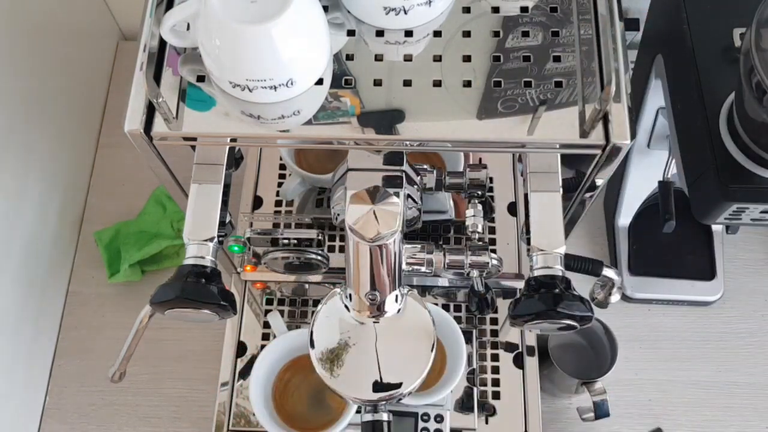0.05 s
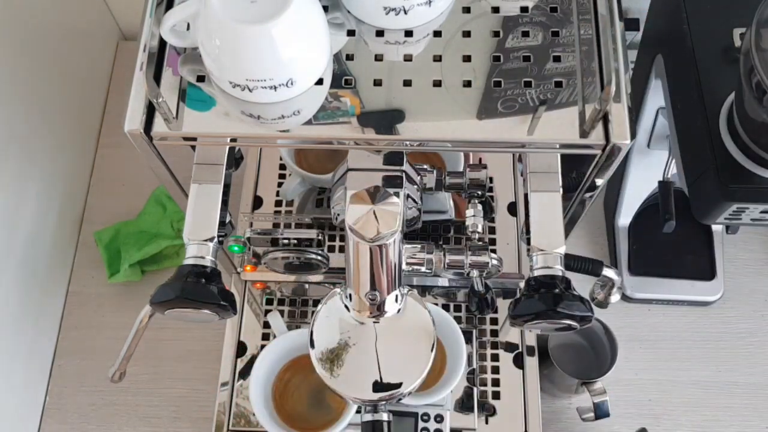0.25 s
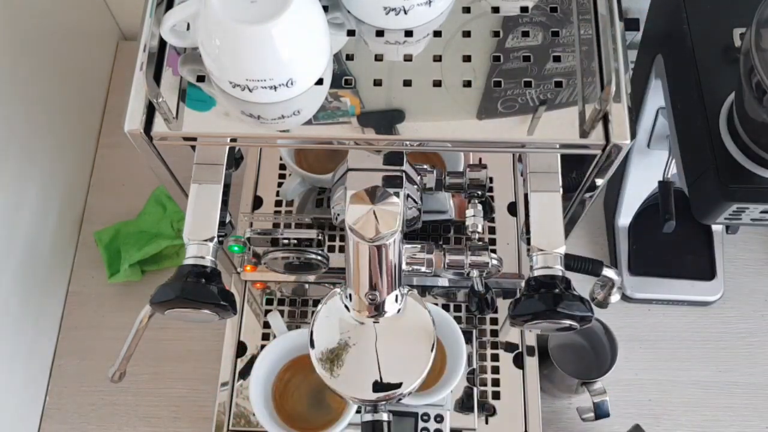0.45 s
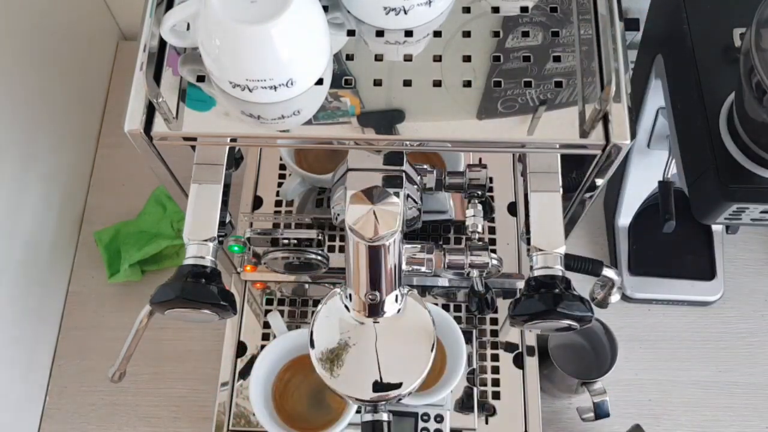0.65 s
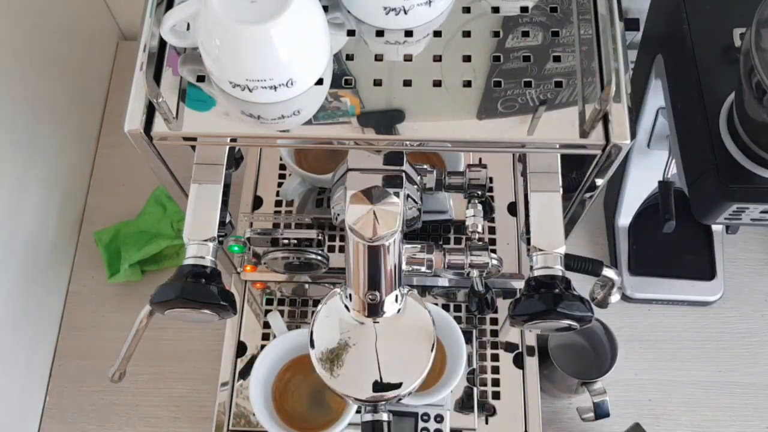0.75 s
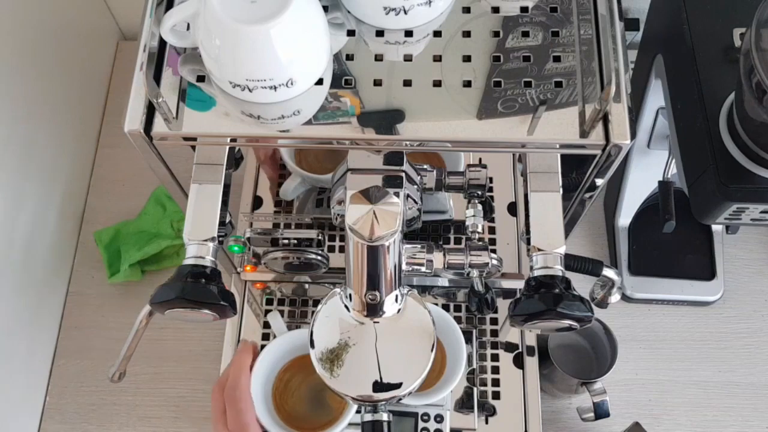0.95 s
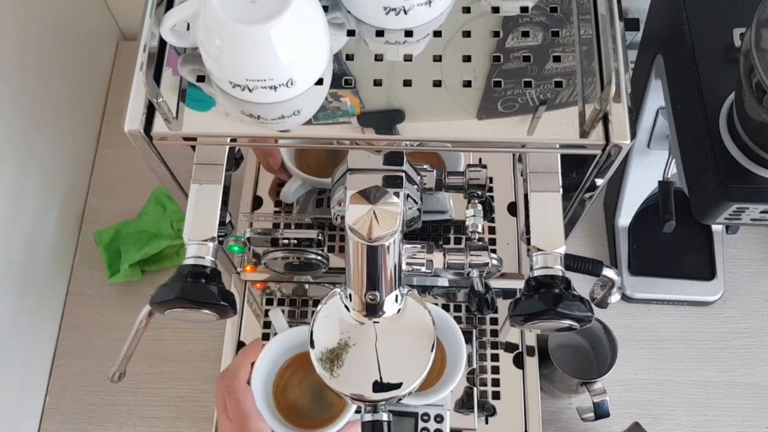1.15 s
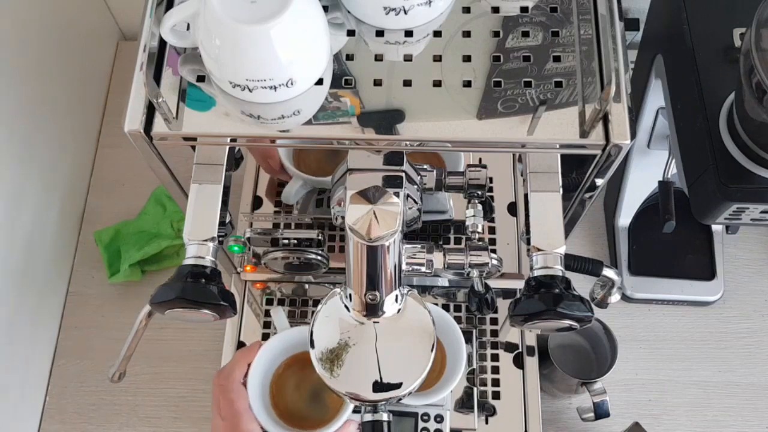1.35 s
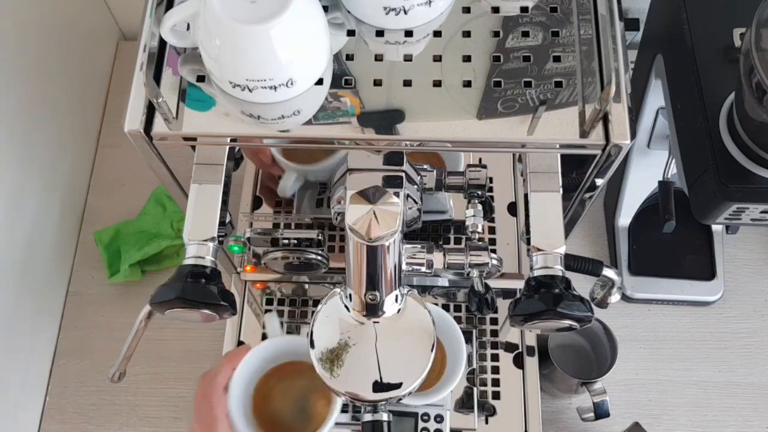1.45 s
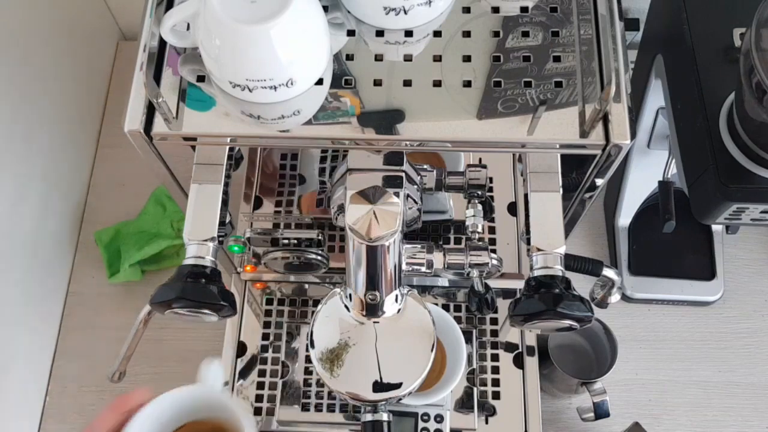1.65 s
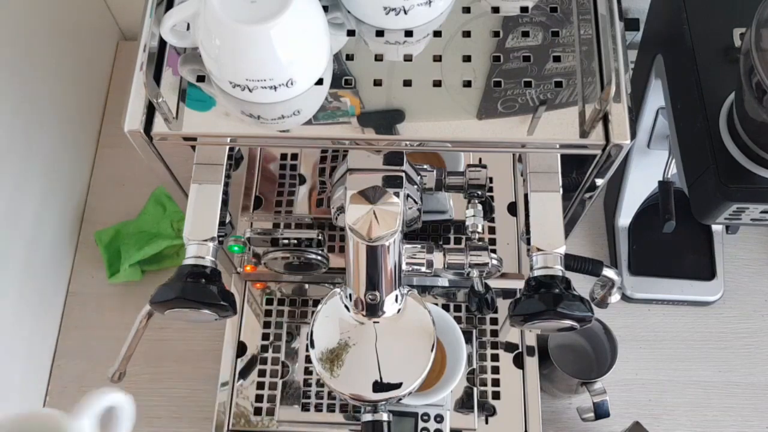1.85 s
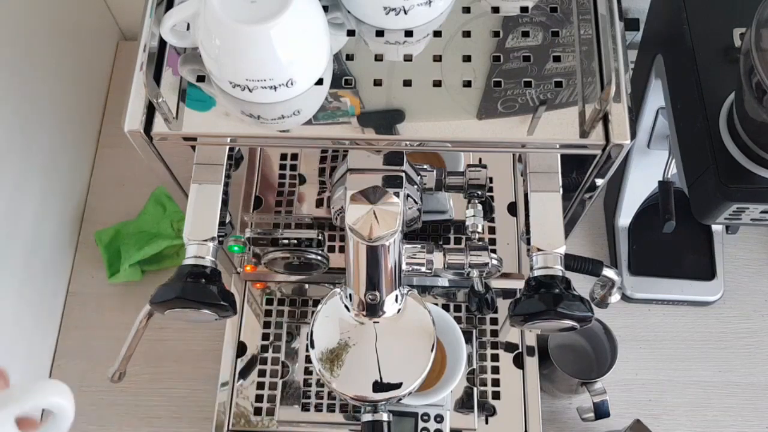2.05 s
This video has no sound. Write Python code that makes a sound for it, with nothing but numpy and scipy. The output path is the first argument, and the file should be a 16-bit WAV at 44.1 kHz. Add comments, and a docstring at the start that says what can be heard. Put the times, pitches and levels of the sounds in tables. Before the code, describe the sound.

An espresso machine switch clacks loudly at about 0.2 seconds, briefly ringing the steel case, and a duller knock follows at 0.4. From 1.1 to 1.6 seconds a cup is nudged, then dragged off the drip tray, scraping quietly with faint metal bumps and a chink near 1.4. A low hum, room air and faint handling rustle lie underneath in a small kitchen, everything slightly to the left.

```python
"""A hard clack comes first: the switch of an espresso machine is thrown in a small kitchen and rebounds
briefly, ringing the steel case. A duller knock follows from inside. Then a cup is nudged on the drip
tray and dragged off it: its foot sticks and slips on the grid, the cup chinks and the tray booms faintly.
A low hum, room air and a faint rustle of handling lie under it all."""
import sys
import numpy as np
from scipy import signal
from scipy.fft import rfft, irfft, next_fast_len
from scipy.io import wavfile
from scipy.ndimage import map_coordinates

SR = 44100
rng = np.random.default_rng(int(sys.argv[2]) if len(sys.argv) > 2 else 0)


def to_wav(s):
    """Save 16-bit WAV."""
    ch = np.atleast_2d(s).T  # columns
    pcm = np.round(np.clip(ch, -1, 1) * 32767)  # PCM
    wavfile.write(sys.argv[1], SR, pcm.astype(np.int16))


N = 92610

# tone of the room air (frequency [Hz], level [dB])
AIR_COLOUR = [(25, -18.5), (60, -6.5), (110, -13.5), (145, 3.5), (180, -13.5), (230, -9.5), (310, -20),
              (450, -28.5), (800, -32.5), (1500, -34.5), (4000, -37.5), (5800, -42), (7300, -39.5),
              (8600, -48), (11500, -30), (15500, -33)]
# how far air and hum lean left (frequency [Hz], left over right [dB])
AIR_LEAN = [(50, 3.5), (150, 4.5), (400, 5.5), (2000, 1.3)]
# how far all other sounds lean left (frequency [Hz], left over right [dB])
SOURCE_LEAN = [(60, 5), (110, 2.5), (200, 4), (380, 0), (700, 5.5), (1300, 2), (2400, 2), (8000, 2.5),
               (15000, 3)]
# how alike the two ears are (frequency [Hz], likeness [0 to 1])
EAR_LIKENESS = [(60, .9), (140, 0.73), (300, 0.83), (640, 0.58), (1400, 0.12), (4000, 0.038)]
# loudness of the handling rustle (time [s], level [dB])
RUSTLE_LEVEL = [(0, -62), (.08, -65.5), (.2, -68), (.71, -71), (.73, -68.5), (.84, -69.5), (.93, -78),
                (1.9, -95.5), (2.1, -70)]
# tone of the rustle (frequency [Hz], level [dB])
RUSTLE_COLOUR = [(50, -8), (120, 5.5), (230, 5), (420, -5), (650, -8), (850, -12.5), (1300, -17),
                 (2500, -26), (7500, -21.5), (16000, -34)]
# how long the room's echo takes to fade by 60 dB (frequency [Hz], fade time [s])
ROOM_FADE = [(100, 1), (350, 0.6), (1000, 0.5), (1800, 0.43), (4000, 0.39), (12000, 0.72)]
# tone of the echo (frequency [Hz], level [dB])
ROOM_COLOUR = [(60, -10.5), (200, -15), (500, -8), (1000, -4.5), (1600, -1), (4000, -3.5), (14000, -10)]

# pressure of the cup's foot on the grid (time [s], level [dB])
SCRAPE_LEVEL = [(1.0, -100), (1.097, -99.5), (1.101, -64.5), (1.138, -54), (1.18, -59.5), (1.23, -75),
                (1.342, -86), (1.358, -61.5), (1.378, -55), (1.39, -47), (1.412, -43), (1.44, -50),
                (1.462, -59.5), (1.496, -86), (1.572, -73), (1.63, -100)]
# tone of the tiny slips (frequency [Hz], level [dB])
GRIT_COLOUR = [(290, -42.5), (500, -15.5), (716, -1.5), (888, -20), (1150, -7), (1800, -7.5), (2330, -6),
               (3060, -6.5), (4380, -6.5), (5670, -10), (7240, -12), (13000, -11.5), (15500, -13)]
# resonances of cup and grid (frequency [Hz], width [Hz], level [dB])
CUP_PEAKS = [(560.4, 20, 10), (800, 51, 0), (1150, 61, 5), (1380, 270, 2.5), (2035, 22, 6), (2290, 21, 9.5),
             (3270, 40, 3), (4158, 18, 10.5), (4645, 39, 6.5), (7140, 280, 7.5), (9470, 70, 2),
             (11090, 84, 9)]
# loudness of the soft sliding (time [s], level [dB])
SLIDE_LEVEL = [(0.98, -76), (1.06, -71), (1.12, -53.5), (1.2, -58.5), (1.26, -65.5), (1.33, -64),
               (1.39, -60), (1.46, -54.5), (1.51, -65), (1.57, -66.5), (1.64, -106)]
# tone of the sliding (frequency [Hz], level [dB])
SLIDE_COLOUR = [(100, 12), (300, 9), (800, -6.5), (1500, -15.5), (2500, -11.5), (5000, -13), (7500, -19),
                (9000, -21.5), (16000, -34.5)]
# hollow resonance, cup at rest and then pulled out (frequency [Hz], width [Hz], level [dB])
HOLLOW_PEAKS = [(928, 233, 12.5), (1540, 390, 23)]
# the foot clicks over the edges of the grid (time [s], level [dB])
CHINKS = [(1.099, -59.5), (1.386, -56), (1.408, -48)]
# ringing notes of the cup (frequency [Hz], level [dB], fade time [s])
CUP_NOTES = [(1202, -3.5, 0.094), (1414, -19, 0.34), (4160, 3, .04), (7250, -18, 0.019),
             (11250, -13, 0.017)]
# the cup catches on the tray (time [s], level [dB])
BUMPS = [(1.099, -60), (1.1132, -44.5), (1.162, -48.5), (1.351, -45), (1.424, -44.5), (1.443, -45),
         (1.519, -55)]
# ringing notes of the tray (frequency [Hz], level [dB], fade time [s])
TRAY_NOTES = [(66.7, -13.5, 0.37), (136.8, -10, 0.54), (150.7, 0, 0.2), (181, -8, 0.71), (241.3, -5, 0.15),
              (406.5, -15.5, 0.24)]

# hits of the switch (time [s], thump [dB], clatter [dB], upper reach of the thump [Hz])
CLACK_HITS = [(0.2130, -15.5, -16.5, 3007), (0.2190, -15, -20.5, 1297), (0.2238, -12.5, -24, 404.2),
              (0.2335, -20.5, -28.5, 1100), (0.290, -35.5, -43, 485)]
# hits of the knock (time [s], thump [dB], clatter [dB], upper reach of the thump [Hz])
KNOCK_HITS = [(0.3659, -26, -36, 1500), (0.3690, -23, -39, 1110), (0.3772, -28.5, -43.5, 880),
              (0.3937, -18, -60, 405.7), (0.728, -46, -94, 330)]
# ringing notes of the case (frequency [Hz], level at switch [dB], level at knock [dB], fade time [s])
CASE_NOTES = [(66.46, -20.5, -31.5, .55), (78.4, -25.5, -29.5, 0.35), (130.2, -22, -25.5, 0.63),
              (175.9, -7, -12, .09), (195, -6, -9, 0.14), (222.1, -18.5, -6, 0.37), (249.15, -5, -19, 0.2),
              (341.5, -4, 0, .13), (380.8, -4.5, -4, 0.12), (445, -21.5, -9, .2), (508.6, -20, -30, .25),
              (558, -9.5, -20, 0.19), (635, -12, -17, 0.21), (728.3, 1, -21.5, 0.041),
              (769.4, -2, -5, 0.099), (832, -5.5, -25, 0.11), (911, -14, -32, 0.1),
              (1005, -5.5, -10, 0.043), (1181.3, -19, -24, 0.15)]
# tone of the panels' clatter in the clack (frequency [Hz], level [dB])
CLACK_COLOUR = [(40, -36), (150, -10), (400, 0), (800, 2), (1250, -10.5), (1480, -16.5), (2000, -9.5),
                (2400, -17), (2850, -13), (3400, -23), (4700, -23.5), (5500, -32), (7600, -27.5),
                (8600, -34.5), (12500, -34), (16000, -42)]
# tone of their clatter in the knock (frequency [Hz], level [dB])
KNOCK_COLOUR = [(40, -38), (200, -20), (400, -17), (800, 3.5), (1400, -6.5), (2200, -14), (4000, -22),
                (8000, -38.5), (13000, -33), (16000, -53)]
# how long the panels ring (frequency [Hz], fade time [s])
PANEL_FADE = [(200, 0.057), (900, 0.15), (3000, 0.15), (12000, 0.14)]

LEFT_RIGHT = np.array([[.5], [-.5]])  # splits a difference between the two ears
TIME = np.arange(N) / SR


def amp(db):
    """Turn decibels into a gain."""
    return 10 ** (np.asarray(db) / 20)


def unit(x):
    """Scale x to an average strength (rms) of 1."""
    return x / np.sqrt(np.mean(x ** 2) + 1e-20)


def along(points, hz):
    """Read between (frequency, value) points on a log scale."""
    freqs, values = np.transpose(points)
    return np.interp(np.log(hz + 1), np.log(freqs + 1), values)


def level(points):
    """A gain for each sample from (time, level) points, silent outside them."""
    times, db = np.transpose(points)
    return amp(np.interp(TIME, times, db, left=-140, right=-140))


def add(out, start_s, x):
    """Mix x into out from the start time on."""
    i = round(start_s * SR)
    out[..., i:i + x.shape[-1]] += x[..., :N - i]


def filtered(x, response):
    """Turn each frequency of x up or down by response(hz)."""
    n = x.shape[-1]
    padded = next_fast_len(n + 8192)
    return irfft(rfft(x, padded) * response(np.fft.rfftfreq(padded, 1 / SR)), padded)[..., :n]


def resonances(peaks):
    """A flat response with resonant peaks added."""
    return lambda f: 1 + sum(amp(db) * 1j * f * width / (hz * hz - f * f + 1j * f * width)
                             for hz, width, db in peaks)


def stereo(pair, colour):
    """Shape the tone of two unrelated signals and blend them so the bass is alike in both ears."""
    def blend(hz):
        turn = np.arccos(along(EAR_LIKENESS, hz)) / 2
        return amp(along(colour, hz)) * np.array([np.cos(turn), np.sin(turn)])
    mid, side = filtered(pair, blend)
    return np.array([mid + side, mid - side])


def leaning(x, lean):
    """Make x louder on the left."""
    return filtered(x, lambda hz: amp(LEFT_RIGHT * along(lean, hz)))


def noise(colour):
    """Stereo noise with the given tone."""
    return unit(stereo(rng.standard_normal((2, N)), colour))


def fading(x, fade_times):
    """Let each frequency of x fade at its own speed."""
    hz, t, spectrum = signal.stft(x, SR, nperseg=256)
    fade = amp(-60 * t / along(fade_times, hz)[:, None])
    return signal.istft(spectrum * fade, SR, nperseg=256)[1][:, :N]


def ring(notes, rise_s, wander_share=0.0045, turns_per_s=40, ear_lag_s=.0002, scatter_db=1):
    """A struck object's fading notes; each wanders in pitch and comes from its own direction."""
    t, tone = np.arange(SR) / SR, 0
    for hz, db, fade_s in notes:
        wobble = map_coordinates(rng.standard_normal(200), [t * turns_per_s])
        wander = wander_share * np.cumsum(wobble) / SR
        lag = ear_lag_s * rng.standard_normal() * LEFT_RIGHT
        gain = amp(db + scatter_db * rng.standard_normal() - 60 * t / fade_s)
        tone = tone + gain * np.sin(2 * np.pi * hz * (t + wander + lag))
    return tone * (1 - np.exp(-t / rise_s))


def background(air_db=-64, hum_hz=139.4, hum_db=-73.5, waver_db=6.5):
    """Room air with a low, wavering hum."""
    drift, waver = [map_coordinates(points, [TIME * 8]) for points in rng.standard_normal((2, 24))]
    hum = np.sqrt(2) * amp(hum_db + waver_db * waver) * np.sin(2 * np.pi * hum_hz * TIME + 1.7 * drift)
    return leaning(amp(air_db) * noise(AIR_COLOUR) + hum, AIR_LEAN)


def handling_rustle():
    """Handling makes a faint, low noise that swells and sinks."""
    return noise(RUSTLE_COLOUR) * level(RUSTLE_LEVEL)


def kitchen_echo(x, build_s=0.0087, lean_db=1):
    """Sound bounces around the room in a wash that builds quickly and dies away."""
    tail = fading(noise([(20, 0), (20000, 0)]), ROOM_FADE) * (1 - np.exp(-TIME / build_s))
    tail = filtered(tail / np.linalg.norm(tail[0]), lambda hz: amp(along(ROOM_COLOUR, hz)))
    echo = signal.fftconvolve(x.mean(0)[None], tail, axes=1)[:, :N]
    return echo * amp(lean_db * LEFT_RIGHT)


def cup_scrape(slips_per_s=4500, spread_db=1.5, stick_hz=177.7, stick_db=-0.5):
    """The foot sticks and slips; each tiny slip makes cup and grid ring."""
    stick = amp(stick_db * map_coordinates(rng.standard_normal(1000), [TIME * stick_hz]))
    slipping = rng.random(N) < slips_per_s / SR
    slips = slipping * amp(spread_db * rng.standard_normal(N)) * rng.standard_normal((2, N))
    grit = stereo(stick * slips, GRIT_COLOUR)
    return unit(filtered(grit, resonances(CUP_PEAKS))) * level(SCRAPE_LEVEL)


def cup_slide(pull_s=1.36, blend_s=0.028):
    """Soft rubbing; its hollow tone gives way to a higher one as the cup leaves the grid."""
    rub = noise(SLIDE_COLOUR)
    pulled = .5 + .5 * np.tanh((TIME - pull_s) / blend_s)
    resting, leaving = [unit(filtered(rub, resonances([peak]))) for peak in HOLLOW_PEAKS]
    return (resting * (1 - pulled) + leaving * pulled) * level(SLIDE_LEVEL)


def taps(hits, notes, rise_s):
    """Each light hit sets an object's notes ringing."""
    out = np.zeros((2, N))
    for start_s, db in hits:
        add(out, start_s, amp(db) * ring(notes, rise_s))
    return out


def dragged_cup(lean_db=2.5):
    """The cup scrapes and slides; grid edges make it chink, and the tray booms where it catches."""
    rubbing = cup_scrape() + cup_slide()
    chinks = taps(CHINKS, CUP_NOTES, rise_s=0.0016)
    booms = taps(BUMPS, TRAY_NOTES, rise_s=0.0019)
    return (rubbing + chinks + booms) * amp(lean_db * LEFT_RIGHT)


def case_blows(hits, notes, colour, crack_db=-18.5, crack_fade_s=0.0075):
    """Each hit rings the case, only its low notes if the hit is soft, and sets the panels clattering."""
    out = np.zeros((2, N))
    crack = 1 + amp(crack_db - 60 * TIME / crack_fade_s)  # sharpens the start of the clatter
    for start_s, thump_db, clatter_db, reach_hz in hits:
        struck = [(hz, db - 20 * np.log10(1 + (hz / reach_hz) ** 4), fade_s) for hz, db, fade_s in notes]
        add(out, start_s, amp(thump_db) * ring(struck, rise_s=0.0023))
        add(out, start_s, amp(clatter_db) * crack * fading(noise(colour), PANEL_FADE))
    return out


def espresso_machine():
    """The clack and the knock strike the same steel case at different places."""
    hz, switch_db, knock_db, fade_s = np.transpose(CASE_NOTES)
    clack = case_blows(CLACK_HITS, list(zip(hz, switch_db, fade_s)), CLACK_COLOUR)
    knock = case_blows(KNOCK_HITS, list(zip(hz, knock_db, fade_s)), KNOCK_COLOUR)
    return clack + knock


def scene(cup_echo_db=-2.5):
    """Machine and cup stand a little to the left in the humming kitchen."""
    machine, cup, rustle = espresso_machine(), dragged_cup(), handling_rustle()
    echo = kitchen_echo(machine + amp(cup_echo_db) * cup)
    return leaning(machine + cup + rustle + echo, SOURCE_LEAN) + background()


def record(dry, low_cut_hz=57, top_hz=15720):
    """The microphone drops the deep bass and the very highest treble."""
    thinned = signal.sosfilt(signal.butter(4, low_cut_hz, "highpass", fs=SR, output="sos"), dry)
    return filtered(thinned, lambda hz: np.clip((top_hz + 100 - hz) / 200, 0, 1))


dry = scene()
out = record(dry)
to_wav(out)
```